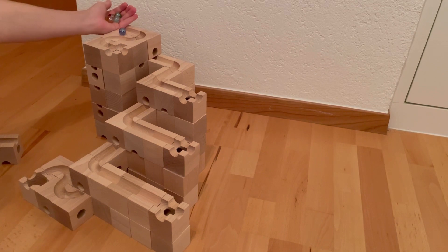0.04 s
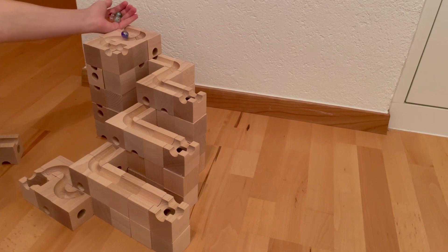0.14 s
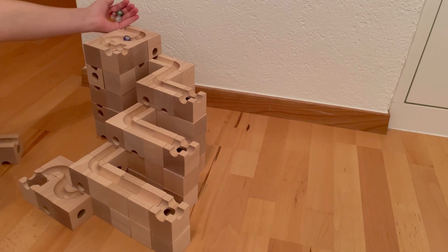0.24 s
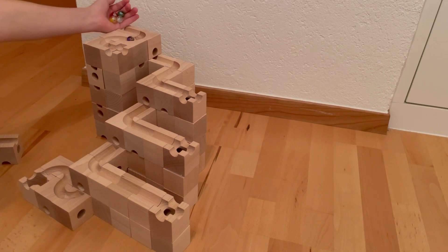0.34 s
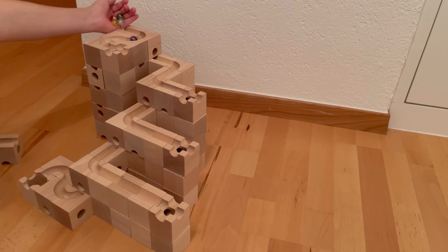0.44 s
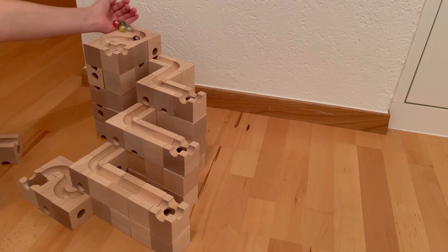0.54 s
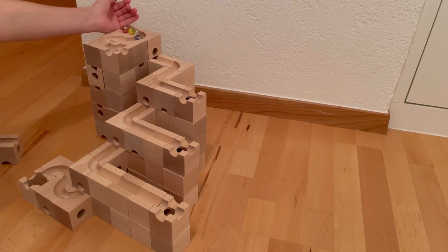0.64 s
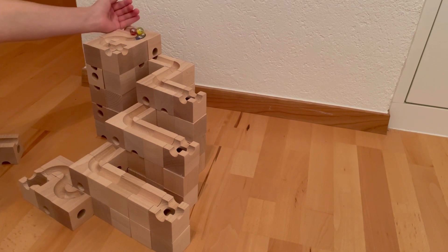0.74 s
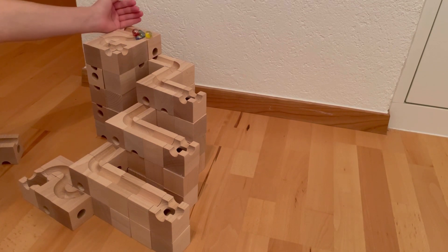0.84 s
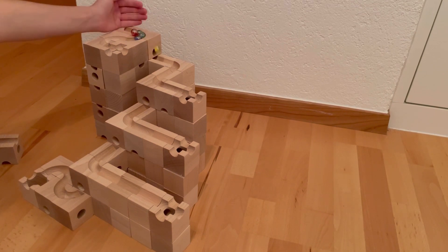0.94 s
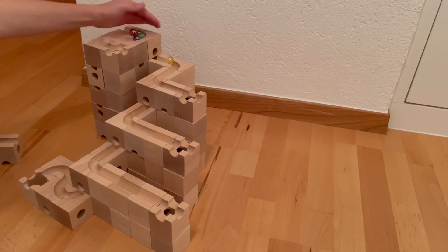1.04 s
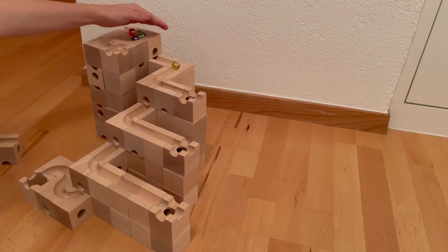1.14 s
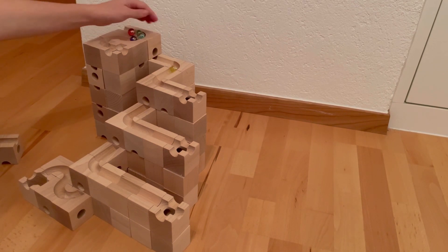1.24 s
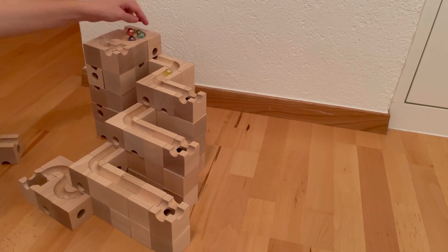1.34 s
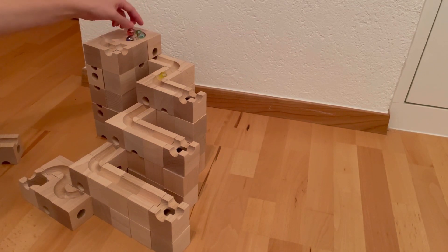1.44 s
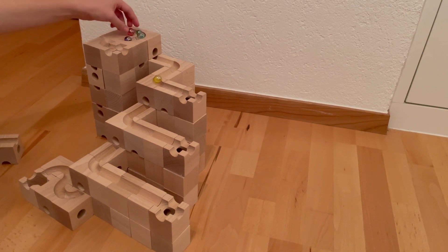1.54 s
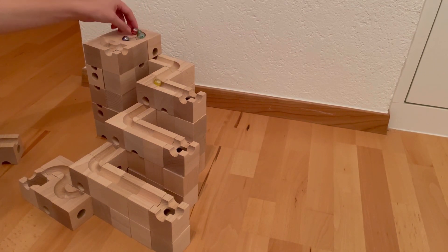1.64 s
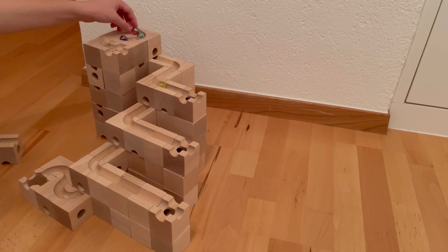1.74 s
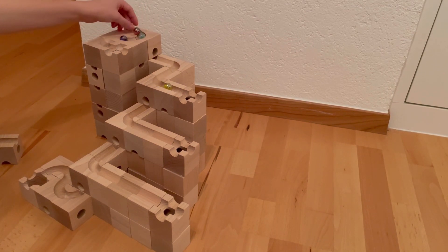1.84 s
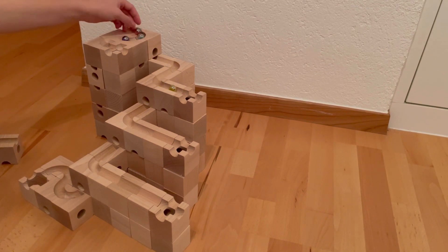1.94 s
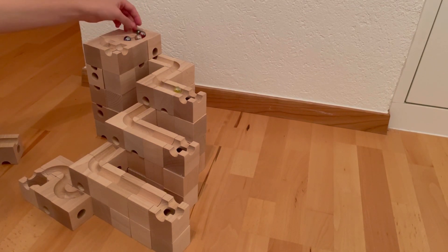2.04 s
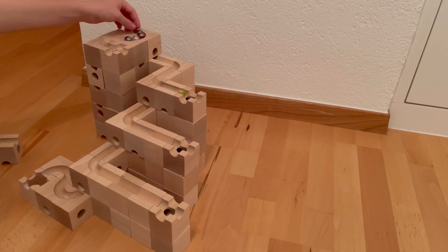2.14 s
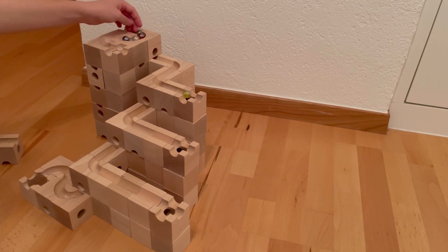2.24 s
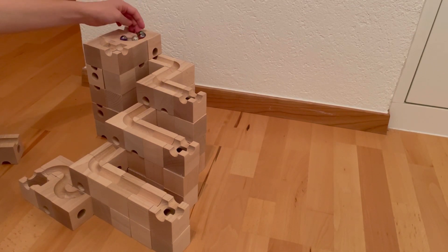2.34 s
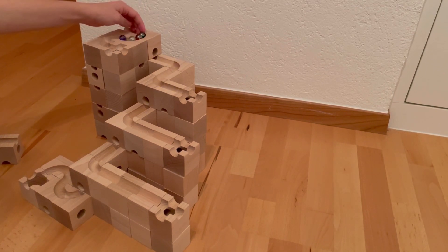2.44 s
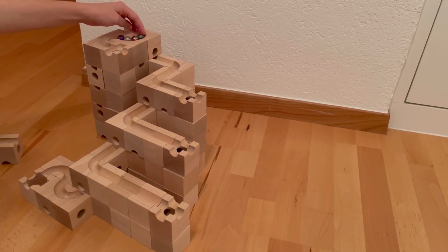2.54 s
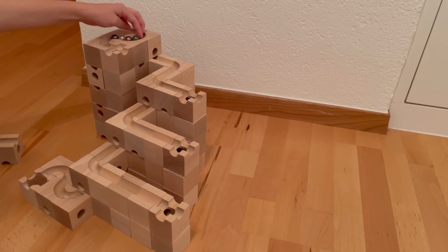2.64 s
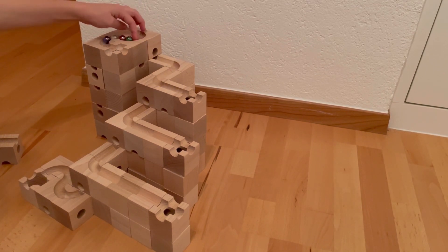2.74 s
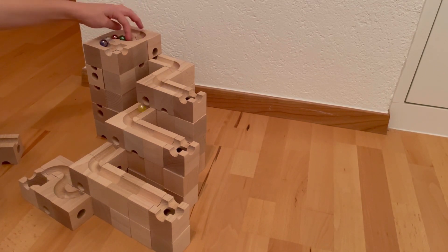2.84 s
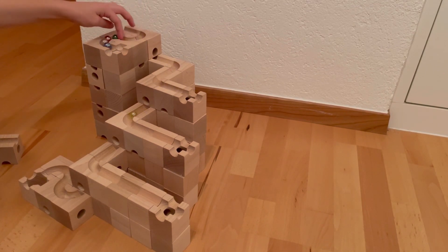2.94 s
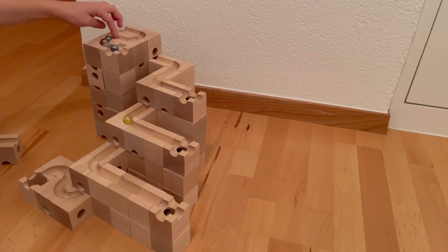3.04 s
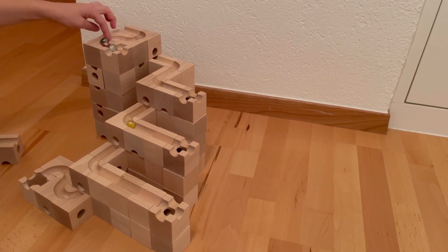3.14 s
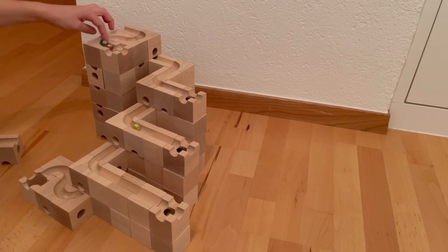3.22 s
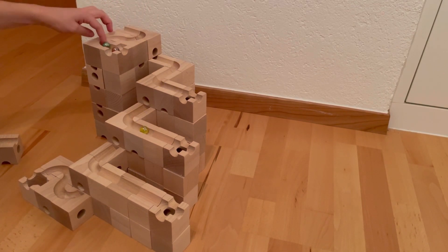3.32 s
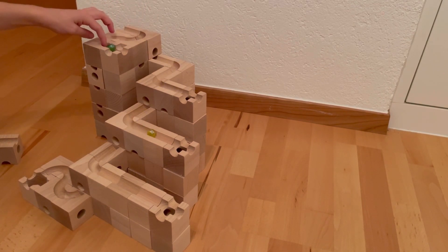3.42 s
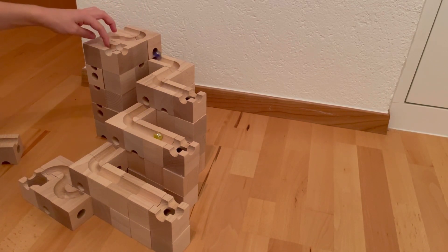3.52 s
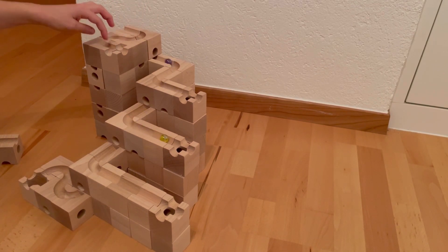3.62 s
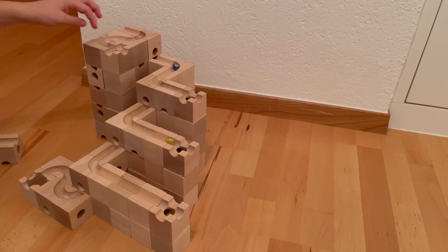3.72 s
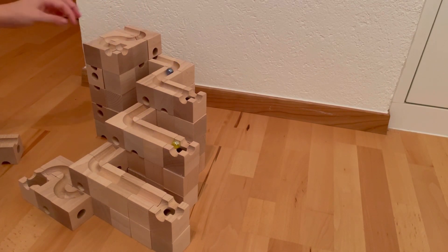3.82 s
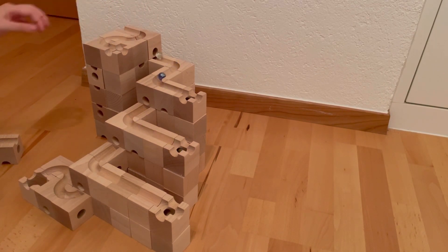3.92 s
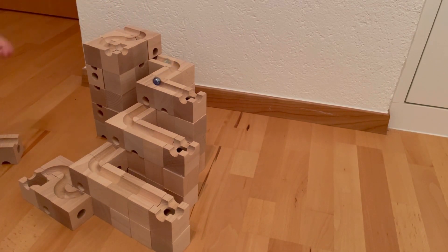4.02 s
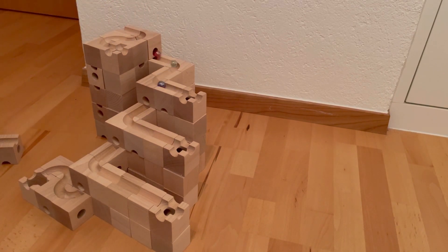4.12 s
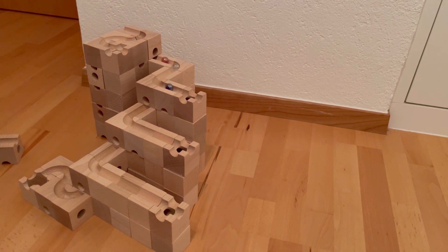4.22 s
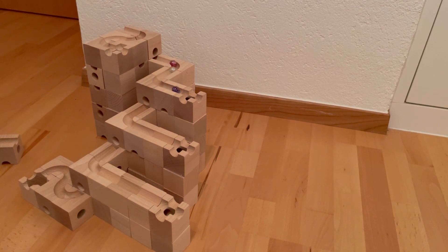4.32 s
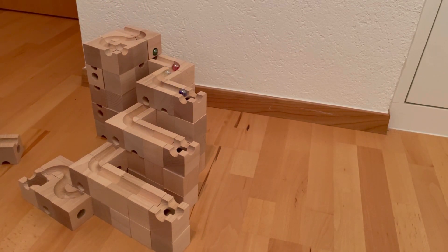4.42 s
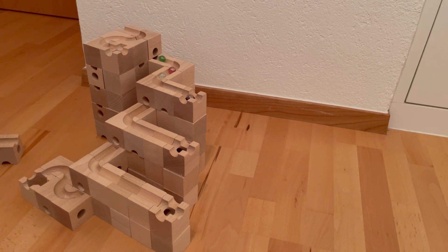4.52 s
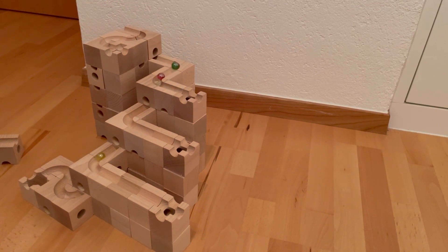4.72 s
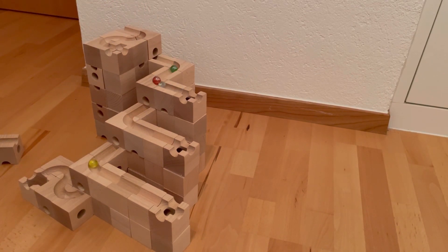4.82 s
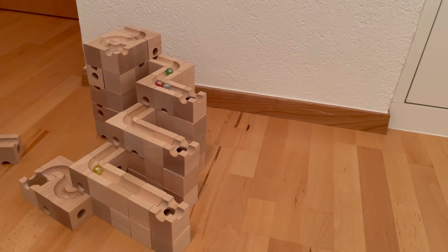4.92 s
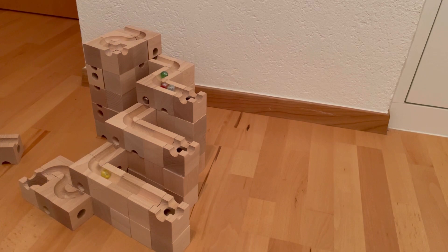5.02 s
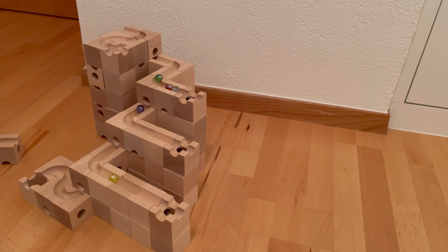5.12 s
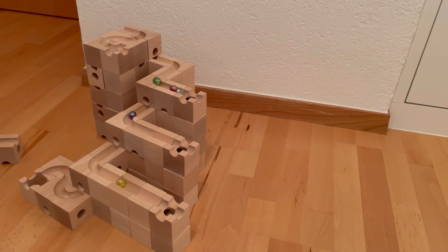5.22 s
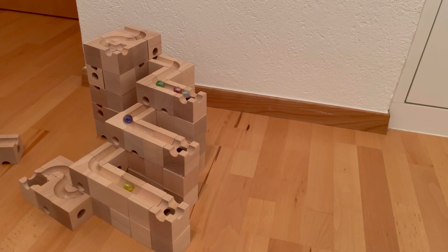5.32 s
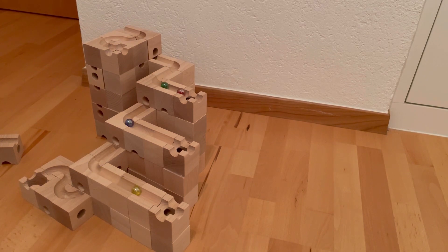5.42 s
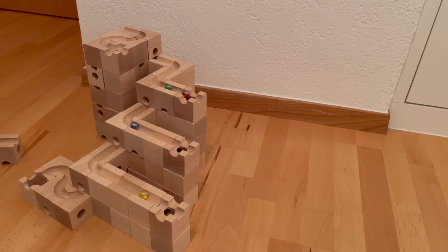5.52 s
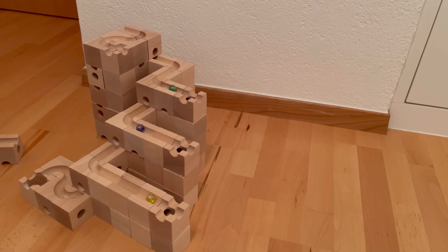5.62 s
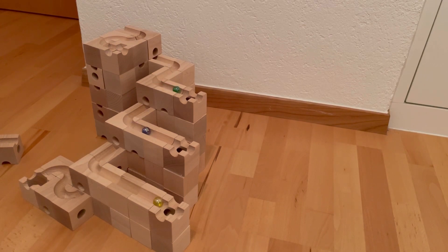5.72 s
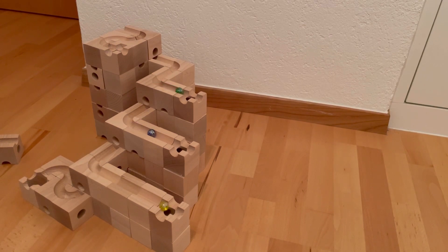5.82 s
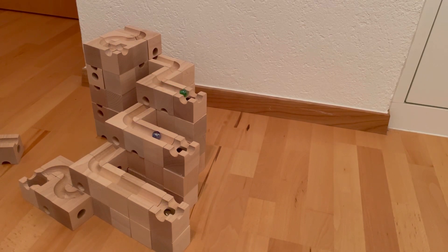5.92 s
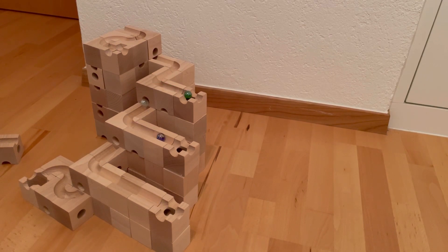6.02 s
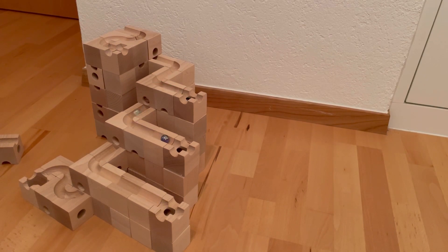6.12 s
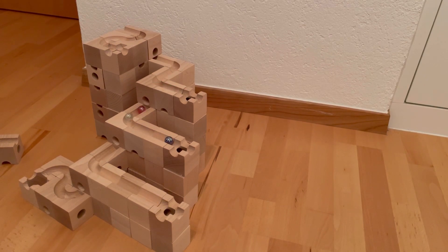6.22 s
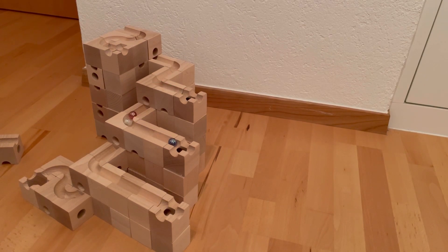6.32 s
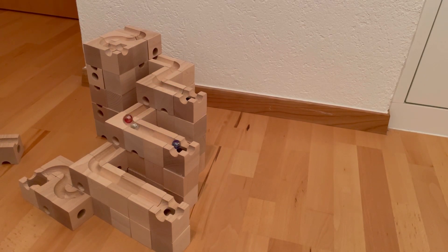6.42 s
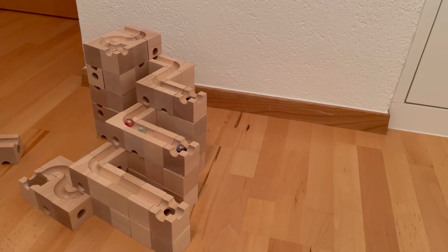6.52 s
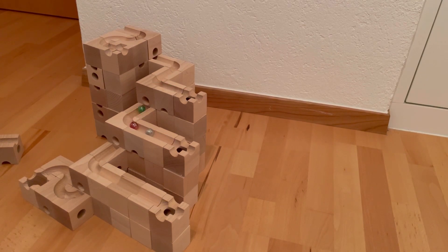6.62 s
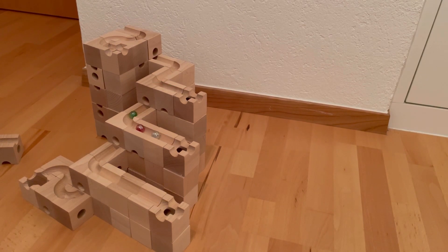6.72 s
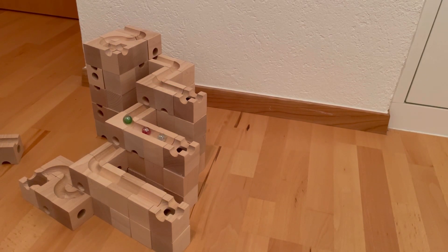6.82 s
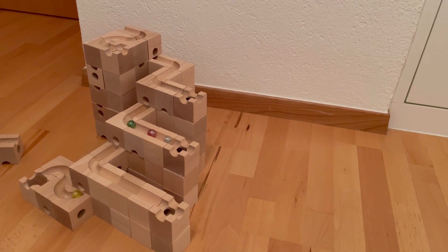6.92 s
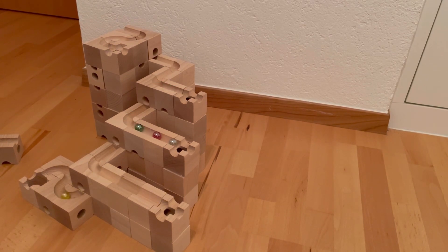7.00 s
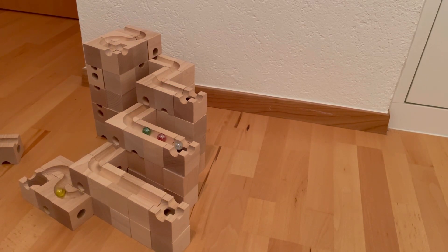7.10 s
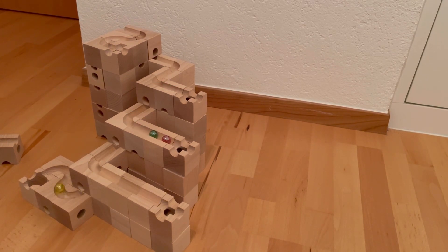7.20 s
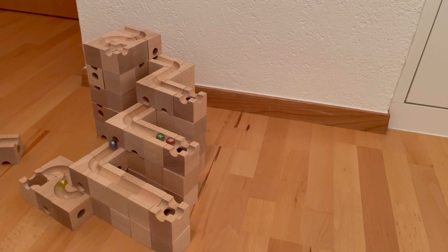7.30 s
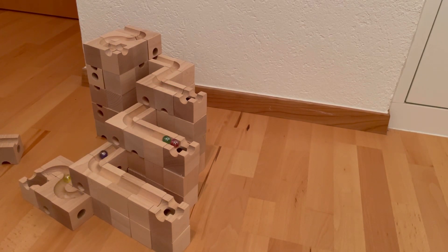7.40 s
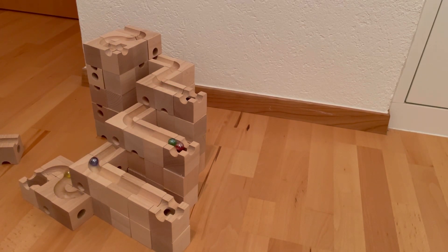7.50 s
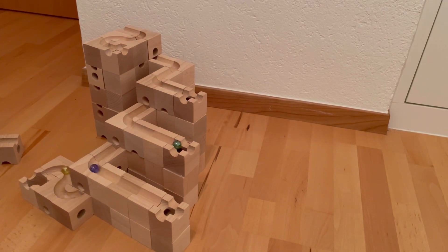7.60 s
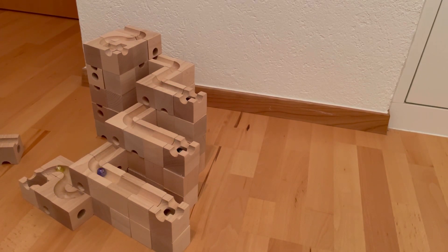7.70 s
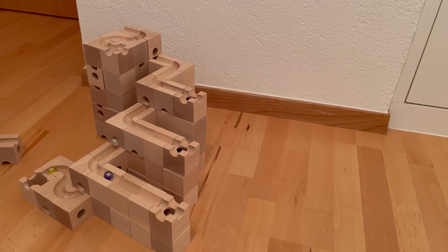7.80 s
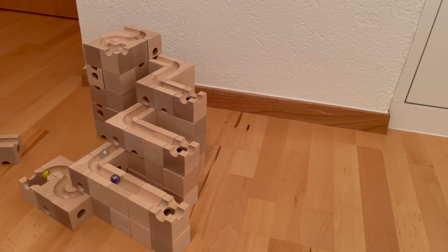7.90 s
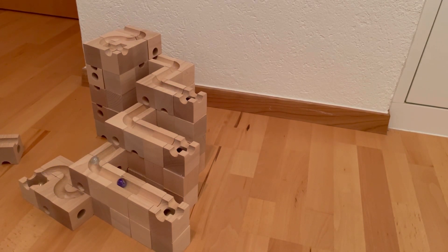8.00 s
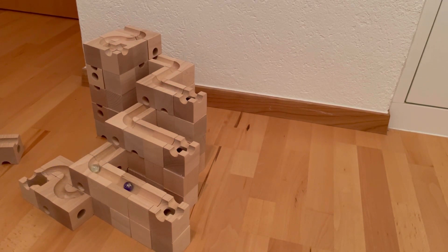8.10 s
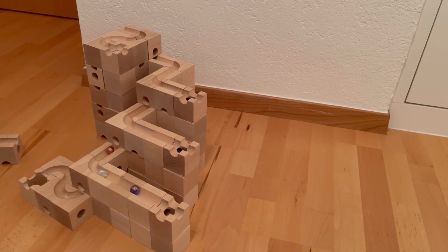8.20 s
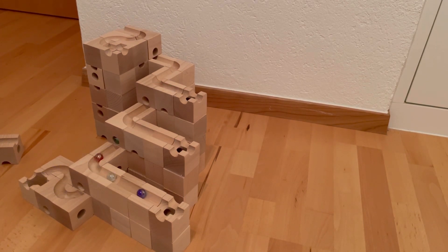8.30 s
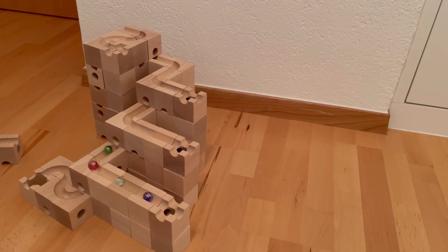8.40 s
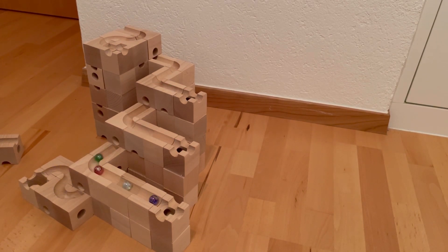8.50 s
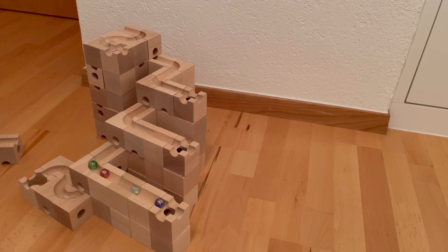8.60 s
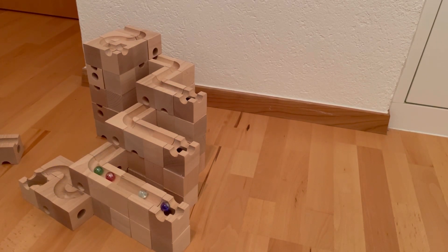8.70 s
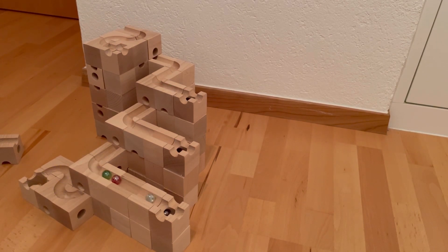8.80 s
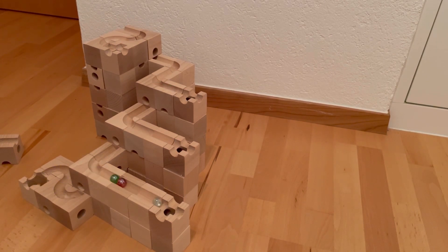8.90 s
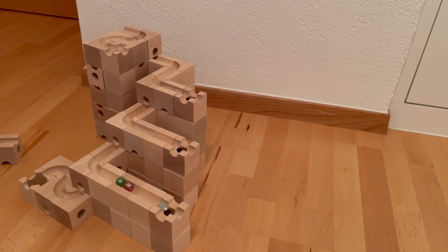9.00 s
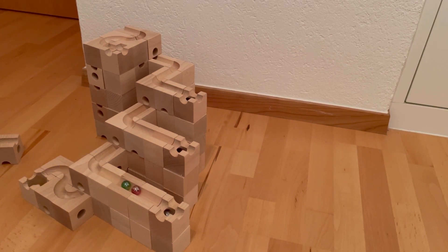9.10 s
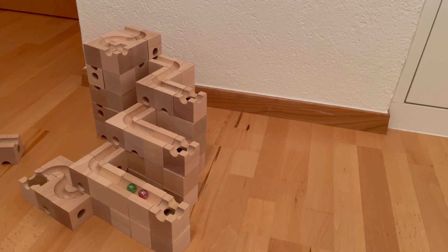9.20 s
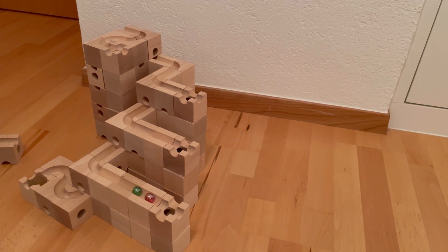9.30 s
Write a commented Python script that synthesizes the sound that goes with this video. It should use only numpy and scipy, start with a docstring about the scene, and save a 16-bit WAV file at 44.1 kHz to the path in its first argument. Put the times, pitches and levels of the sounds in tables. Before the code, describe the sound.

Close-up of a wooden marble run on a parquet floor. Marbles land in a quick burst, clack together, nearly fall quiet, then are nudged off and descend one after another: dry hollow knocks, light high pings, grainy rolling and soft low floor rumble. The clatter grows busy, peaks with a hard knock, then thins to a few taps. Small, lightly reverberant room.

```python
"""Glass marbles drop into a tower of wooden blocks on a parquet floor and run down its grooves and tunnels.
Each blow rings thud and knock modes, adds a high sine ping, and cracks and ticks in bursts of noise.
Marbles clack together in treble bursts, rumble along on dense tiny bumps, and hollow blocks hum as noise
through narrow resonances; low noise drones in the floor. A bare room answers with decaying noise echoes.
Two close microphone ports listen; they differ in level and phase, and faint sound is turned down."""
import sys
import numpy as np
from scipy import signal
from scipy.fft import rfft, irfft, next_fast_len
from scipy.io import wavfile
from scipy.ndimage import uniform_filter1d, minimum_filter1d

SR = 44100
rng = np.random.default_rng(int(sys.argv[2]) if len(sys.argv) > 2 else 0)


def pcm_store(signal):
    """Save signal as 16-bit PCM."""
    levels = np.round(np.clip(np.atleast_2d(signal), -1, 1) * 32767)
    wavfile.write(sys.argv[1], SR, levels.astype(np.int16).T)


N = 412335


def amp(db):
    """Amplitude factor of a level in dB."""
    return 10 ** (np.asarray(db) / 20)


def rms_one(x):
    """Scale to an RMS of one."""
    return x / np.sqrt(np.mean(x ** 2) + 1e-20)


def at_hz(points, hz):
    """Read a curve, straight over log frequency."""
    curve_hz, values = np.transpose(points)
    return np.interp(np.log(np.maximum(hz, 1)), np.log(np.maximum(curve_hz, 1)), values)


def in_time(rows):
    """Columns of a curve over seconds, read at every sample."""
    s, *columns = np.transpose(rows)
    return [np.interp(np.arange(N) / SR, s, column) for column in columns]


def in_frequency(x, response):
    """Filter by a complex response given as a function of Hz."""
    size = next_fast_len(N + SR)
    hz = np.arange(size // 2 + 1) * SR / size
    return irfft(rfft(x, size) * response(hz), size)[..., :N]


def band(x, low_hz, high_hz, order):
    """Butterworth band-pass."""
    edges = [low_hz, min(high_hz, .45 * SR)]
    return signal.sosfilt(signal.butter(order, edges, "band", fs=SR, output="sos"), x)


def ring(clicks, hz, t60):
    """A unit click sets a sine of height about 1 ringing; it falls 60 dB in t60 seconds."""
    r, w = amp(-60 / (t60 * SR)), 2 * np.pi * hz / SR
    return signal.lfilter([0, np.sin(w)], [1, -2 * r * np.cos(w), r * r], clicks + 1e-18)


def wood(modes, at, level_db, spread_db, centre_hz, focus_db, scatter_s):
    """Every contact strikes each mode with its own strength and small lag, most of all those near its centre."""
    chance = rng.standard_normal((len(at), len(modes), 2))
    out = np.zeros(N)
    for k, (hz, mode_db, t60) in enumerate(modes):
        lag = (np.abs(chance[:, k, 1]) * scatter_s * SR).astype(int)
        away_db = focus_db * np.abs(np.log2(hz / centre_hz))   # focus_db per octave from the centre
        strike_db = level_db + mode_db - away_db + spread_db * chance[:, k, 0]
        clicks = np.zeros(N)
        clicks[np.minimum(at + lag, N - 1)] = amp(strike_db) * (-1) ** k   # neighbouring modes start opposed
        out += ring(clicks, hz, t60)
    return out


# a marble runs on after a blow: its noise swells, then fades (amplitude time constants)
RUN_RISE_S, RUN_FADE_S = 0.004, 0.074


def run_on(level_db):
    """Height of the rolling noise that the blows leave behind: a swell and a fade after each, powers added."""
    power = np.zeros(N)
    power[np.round(np.array(BLOWS)[:, 0] * SR).astype(int)] = amp(2 * level_db)
    rise, fade = np.exp(-2 / (RUN_RISE_S * SR)), np.exp(-2 / (RUN_FADE_S * SR))
    risen = signal.lfilter([1 - rise], [1, -rise], power + 1e-18)
    return np.sqrt(signal.lfilter([1], [1, -fade], risen))


# Steady rolling in the grooves between blows. Each row: time in seconds, rumble in dB, rattle in dB.
ROLL = [(0.0, -53.5, -81), (0.4, -68, -72), (0.7, -43, -70), (1.3, -70.5, -78.5), (1.62, -59, -100),
        (1.705, -63, -94), (1.72, -51, -71), (1.81, -60.5, -64), (1.86, -82, -83), (1.9, -99, -99),
        (2.1, -86, -59.5), (2.4, -54.5, -67), (3.0, -45.5, -62.5), (3.5, -42.5, -41), (3.75, -51, -60),
        (4.4, -43, -56), (5.1, -57, -88), (5.9, -46.5, -52), (7.6, -48.5, -69), (8.1, -48, -51),
        (8.64, -53, -80), (9.35, -55.5, -69)]
RUN_RUMBLE_DB, RUN_RATTLE_DB = -19.5, -22   # after a blow, against its thud and its knock
LUMPS_PER_S, LUMPS_DB = 27, 2   # the grain is uneven, so the rolling comes in lumps


def rolling():
    """Marbles run over the grain: dense tiny bumps rumble in the low modes and rattle in the high ones."""
    rumble_db, rattle_db = in_time(ROLL)
    s, knock_db, thud_db, thud_hz, *_ = np.transpose(BLOWS)
    at = np.flatnonzero(rng.random(N) < 350. / SR)   # about 350 bumps a second
    lumps = rms_one(uniform_filter1d(rng.standard_normal(N), size=int(SR / LUMPS_PER_S)))
    size_db = 2.5 * np.minimum(rng.exponential(1, len(at)), 3.5) + LUMPS_DB * lumps[at]
    # it rolls in the block it last struck
    rumble_hz = thud_hz[np.maximum(np.searchsorted(s * SR, at) - 1, 0)]
    rumble = wood(THUD_MODES, at, size_db, spread_db=3.0, centre_hz=rumble_hz, focus_db=7.0, scatter_s=.002)
    rattle = wood(KNOCK_MODES, at, size_db, spread_db=5.0, centre_hz=1110.0, focus_db=5.0, scatter_s=.0005)
    rumble = rms_one(band(rumble, 222.0, 1380.0, order=3))
    rattle = rms_one(band(rattle, 400.0, 7100.0, order=2))
    rumble_height = np.hypot(amp(rumble_db), run_on(thud_db + RUN_RUMBLE_DB))
    rattle_height = np.hypot(amp(rattle_db), run_on(knock_db + RUN_RATTLE_DB))
    return rumble_height * rumble + rattle_height * rattle


# Drone through the floor, once marbles run low in the tower. Each row: time in seconds, level in dB.
DRONE = [(0.0, -73), (1.9, -80), (2.97, -98), (3.15, -61.5), (5.0, -56), (9.35, -65)]
# How much of each run reaches the floor. Each row: time in seconds, gain in dB.
DRONE_FOLLOWS = [(0.0, -5.5), (2.97, 3.5), (3.15, 13.5), (7.4, 16.5), (9.35, 12)]
RUN_DRONE_DB = -41.5   # against the thud, before the gain above


def drone():
    """Low noise from the floorboards, nearly alike at both ports; it swells with each run."""
    (level_db,), (follows_db,) = in_time(DRONE), in_time(DRONE_FOLLOWS)
    shared, unlike = band(rng.standard_normal((2, N)), 26.0, 182.0, order=2)
    both = shared + amp(-14.0) * np.array([[1], [-1]]) * unlike
    runs = amp(follows_db) * run_on(np.array(BLOWS)[:, 2] + RUN_DRONE_DB)
    return np.hypot(amp(level_db), runs) * rms_one(both)


def bending(hz, lag_s, power):
    """Bending waves in wood travel slower the lower they are: lag_s at 1 kHz."""
    lag = lag_s * (np.maximum(hz, 150.) / 1000) ** -power
    return np.exp(-2j * np.pi * np.cumsum(lag) * hz[1])   # phase is the lag summed over frequency


def noise_bursts(times, level_db, t60, low_hz, high_hz):
    """Very short bursts of treble noise, each scaled to its own peak."""
    t, out = np.arange(600) / SR, np.zeros(N + 600)
    noise = rng.standard_normal((len(times), len(t))) * amp(-60 * t / t60)
    bursts = band(noise, low_hz, high_hz, order=3)
    for s, gain, burst in zip(times, amp(level_db), bursts):
        out[round(s * SR):][:len(t)] += gain * burst / np.abs(burst).max()
    return out[:N]


# Marble on wood, all down the tower. Each row: start in seconds, knock in dB, thud in dB,
# thud centre in Hz, ping in dB, ping pitch in Hz, crack in dB.
BLOWS = [(0.048, -109, -63, 548, -50, 6040, -52), (0.194, -19.5, -18, 543, -48, 6400, -21.5),
         (0.502, -14, -16.5, 530, -37, 5700, -28), (0.518, -19, -13, 486, -23, 6650, -20.5),
         (0.563, -26, -18, 516, -31, 6600, -32), (0.582, -15, -14, 512, -30, 5700, -23),
         (0.595, -24, -50, 514, -27, 6880, -27), (0.609, -19, -19.5, 465, -34, 5650, -27),
         (0.645, -23.5, -29, 478, -48, 6570.0, -54), (0.807, -28, -22, 506, -45, 7200, -61),
         (0.832, -35, -34.5, 520, -46, 5600, -53), (0.975, -12.5, -15.5, 413, -28, 4240, -23.5),
         (1.065, -20, -18.5, 353, -39, 3900, -38), (1.107, -35, -24, 440.0, -41.5, 5600, -36),
         (1.28, -36, -34, 572, -57, 4000, -51.5), (1.527, -38.5, -38.5, 488, -77, 3820, -72),
         (1.711, -47, -37.5, 335, -82, 3840.0, -107), (1.782, -47, -53.5, 583, -81.5, 5300.0, -72),
         (2.026, -22, -20, 510, -29.5, 7400, -25), (2.048, -34, -29.5, 560, -32, 5700, -44),
         (2.079, -25, -25.5, 495, -35, 5700, -28.5), (2.116, -26, -27.5, 455, -48, 5100, -56),
         (2.307, -23.5, -25, 607, -39, 5320.0, -45), (2.332, -40, -29, 310, -49, 5400, -55),
         (2.411, -31, -31, 473, -29.5, 7250, -35), (2.569, -30.5, -35, 518, -38, 7100, -30.5),
         (2.616, -32, -30, 540, -53, 5600, -55), (2.646, -25, -31, 470, -38, 5730, -43),
         (2.683, -30.5, -34, 400, -42, 5860, -35), (2.834, -25, -26, 410, -38, 5500, -34),
         (2.863, -21.5, -27.5, 497, -26, 5450, -23), (3.092, -26.5, -32, 576, -28, 5220, -50),
         (3.111, -19.5, -22, 520, -37, 6600, -31), (3.148, -36, -29, 530, -44, 5240, -49),
         (3.193, -30, -30.5, 520, -53, 5340, -52), (3.209, -33, -32.5, 540, -21, 5200, -24.5),
         (3.235, -27, -23.5, 538, -47, 5400.0, -49), (3.34, -25.5, -27, 486, -18.5, 5230.0, -26),
         (3.396, -24.5, -26.5, 466, -24, 4800, -19), (3.424, -27, -30, 550, -37, 5300, -47),
         (3.463, -36, -28, 570, -25, 4500, -16.5), (3.508, -38, -25.5, 470.0, -22, 5260, -29),
         (3.526, -34, -28, 520, -45, 5300, -45), (3.553, -17.5, -22.5, 416, -28, 6430, -17),
         (3.591, -28, -30, 477, -22.5, 5400, -18.5), (3.622, -23.5, -21, 547, -30, 6800, -47),
         (3.766, -24, -24, 487, -39, 4300, -40), (3.791, -25, -26, 560, -38, 4680, -29),
         (3.909, -22, -21, 380, -33, 5540, -30), (3.929, -14.5, -22, 368, -26, 5600, -21.5),
         (3.953, -33, -18.5, 394, -28, 7170, -26), (4.06, -43, -29.5, 627, -55, 5500, -59),
         (4.122, -29.5, -28, 360, -60, 3800, -47), (4.171, -18, -21, 414, -24, 6610, -20.5),
         (4.215, -25, -27, 422, -50, 5500, -45), (4.228, -28, -24, 417, -25, 7130, -26.5),
         (4.272, -27.5, -31.5, 500, -53, 5500, -50), (4.337, -29, -41, 390, -41, 4280, -41),
         (4.379, -36, -40, 384, -41, 3800.0, -36), (4.403, -35, -32.5, 630, -58, 5460, -59),
         (4.483, -18, -22.5, 430, -24, 6630, -21), (4.528, -32, -24, 554, -50, 5500, -50),
         (4.551, -22, -21, 605, -43, 4000, -31.5), (4.611, -18.5, -24, 290, -17.5, 6700, -17),
         (4.666, -30, -40, 340, -47, 6600, -35), (4.755, -37, -34, 610, -53, 5500, -55),
         (4.788, -23, -29, 503, -37, 5780, -39), (4.819, -28.5, -37, 695, -42, 5760, -34),
         (4.837, -34, -55, 448, -40, 5700, -33.5), (4.859, -33, -35.5, 652, -55, 5800, -50),
         (4.93, -34, -34, 467, -55, 5700, -53), (4.956, -33.5, -29, 474, -57, 5800, -52),
         (5.095, -16, -24.5, 504, -17, 6690, -22), (5.165, -29.5, -28, 353, -31, 6700, -31),
         (5.241, -43, -40, 660, -51, 6700, -53), (5.329, -47, -41, 590, -58, 6700, -62),
         (5.392, -23.5, -24, 618, -31, 6500, -33.5), (5.416, -21.5, -26.5, 610, -26, 6900, -24),
         (5.4266, -31, -27, 640, -26.5, 5300, -35), (5.4467, -28, -30, 642, -28.5, 6650, -29),
         (5.602, -26.5, -23, 570, -35, 6660, -40), (5.625, -20.5, -23, 630, -30, 6780, -30.5),
         (5.6642, -32, -27, 670, -58, 4660, -38), (5.797, -38, -44, 646, -57, 5500, -61),
         (5.829, -27, -29.5, 406, -43, 4000, -40), (5.863, -27, -31, 593, -41, 4240, -65),
         (5.894, -22, -22, 357, -51, 7000, -33), (5.9161, -16, -17, 378, -33, 5330, -28.5),
         (5.999, -30, -29, 341, -45, 5300, -41), (6.041, -28, -29, 340, -45, 5300, -41),
         (6.063, -17.5, -21.5, 580, -22, 5400, -18.5), (6.093, -26, -30, 413, -45, 5360, -45),
         (6.104, -29, -27.5, 302, -31, 7060, -36), (6.13, -34, -30, 557, -50, 5400, -40),
         (6.205, -21, -28, 595, -37, 5480, -27), (6.325, -31, -31, 590, -47, 5660, -42),
         (6.372, -30, -43, 675, -56, 4150.0, -49), (6.399, -23.5, -30, 590, -41, 5670, -41.5),
         (6.492, -33, -45, 488, -48, 5560, -50), (6.527, -24, -23.5, 350, -36, 5500, -23.5),
         (6.542, -24, -31, 515, -29, 5640, -41), (6.566, -17.5, -18.5, 472, -22, 5620, -22.5),
         (6.593, -40, -32, 660, -45, 5460, -45), (6.625, -19.5, -26, 538, -27, 5320, -19),
         (6.667, -31, -27, 425, -50, 5500, -47), (6.756, -29, -26.5, 404, -43, 4430, -40),
         (6.824, -35, -34.5, 386, -58, 3830, -64), (6.922, -20.5, -26.5, 460, -65, 3900, -50),
         (6.928, -16.5, -23, 456, -56, 3830, -25.5), (6.963, -25, -25, 450, -29, 3560, -48),
         (7.111, -34, -29, 377, -39, 3730, -43), (7.144, -34, -47, 402, -44, 6160, -42),
         (7.17, -24.5, -28, 490, -19.5, 5570, -29), (7.192, -21, -26, 438, -52, 5360, -31),
         (7.239, -38, -24, 505, -55, 5400, -55), (7.264, -52, -32, 580, -35, 5350, -50),
         (7.353, -20, -26.5, 290, -27, 6620, -22.5), (7.408, -30, -29.5, 347, -55, 7160, -35),
         (7.558, -25, -24, 514, -31.5, 5600, -31), (7.58, -18, -23, 391, -24, 5500, -20.5),
         (7.703, -22, -27, 372, -24, 5580, -28.5), (7.722, -23, -23, 522, -48, 5440, -37),
         (7.775, -27.5, -30.5, 410, -39, 5380, -58), (7.798, -46, -31, 390, -32.5, 5380, -44),
         (7.855, -33, -37, 342, -61, 5550, -62), (7.876, -21.5, -23, 313, -18.5, 5480, -20),
         (7.927, -25.5, -26.5, 318, -32, 6800, -33), (8.012, -27, -25.5, 380, -38, 3750, -52),
         (8.032, -8.5, -10.5, 440, -17, 4400, -19), (8.094, -24, -45, 487, -17.5, 4360, -35),
         (8.1272, -15, -15, 417, -22, 4450, -41), (8.166, -37, -48, 403, -42, 5260, -48),
         (8.178, -19, -16, 434, -27.5, 4360, -33), (8.218, -33, -46, 360, -23.5, 5450, -30),
         (8.218, -18.5, -20, 353, -19, 6660, -23.5), (8.396, -18, -24, 321, -19.5, 6700, -21),
         (8.498, -56, -40, 376, -61, 6640, -73), (8.627, -43, -30.5, 364, -59, 7090.0, -101),
         (8.7, -46, -44, 356, -67, 5460, -74), (8.715, -40, -35, 317, -50, 5270, -52),
         (8.789, -24, -22.5, 364, -34, 6970, -41), (8.81, -18, -19, 326, -33, 5300, -35),
         (8.844, -53, -50, 338, -36, 5500, -47), (8.873, -54, -32, 312, -44, 7000, -59),
         (8.954, -53, -28, 345, -41, 6750, -48), (9.099, -23.5, -24.5, 397, -22, 5430, -39),
         (9.12, -24.5, -21, 378, -47, 5030, -30), (9.173, -23, -19, 358, -58, 5540, -35),
         (9.287, -35.5, -37.5, 322, -59, 5600, -45), (9.325, -30, -29, 334, -45, 4040, -45)]
# Low and high modes of the stacked blocks. Each row: pitch in Hz, relative level in dB, t60 in seconds.
THUD_MODES = [(201.6, -7, 0.14), (281.2, 3, 0.04), (330, 2.5, 0.0087), (392.4, 2, 0.016), (431, 1, 0.021),
              (516, 1.5, 0.019), (675, 7.5, 0.012)]
KNOCK_MODES = [(810, -1, 0.0074), (1004, 0.5, 0.011), (1240, 0.5, 0.0071), (1468, 3, 0.0064),
               (1870, 2.5, 0.0069), (2123, 2, 0.0099), (2505, -1, 0.0088), (2924, 4.5, 0.0067),
               (3580, 0, 0.0056), (4500, -3.5, 0.0025)]
# Each block pairs its thud with a knock of its own. Each row: thud centre in Hz, knock centre in Hz.
KNOCK_HZ_BY_THUD = [(300, 1570), (345, 1140), (400, 1300), (500, 1200), (620, 1220), (680, 1100)]
PING_T60_S, CRACK_T60_S, TICK_T60_S = .016, .007, 0.03
TICK_UNDER_CRACK_DB = 13.5


def blows():
    """Glass strikes wood: modes thud and knock, noise cracks and ticks; the sine pings come apart."""
    s, knock_db, thud_db, thud_hz, ping_db, ping_hz, crack_db = np.transpose(BLOWS)
    at = np.round(s * SR).astype(int)
    knock_hz = at_hz(KNOCK_HZ_BY_THUD, thud_hz)
    thuds = wood(THUD_MODES, at, thud_db, spread_db=2.5, centre_hz=thud_hz, focus_db=24.0, scatter_s=0.00027)
    knocks = wood(KNOCK_MODES, at, knock_db, spread_db=1.5, centre_hz=knock_hz, focus_db=8.5, scatter_s=.00005)
    # small blocks radiate no deep bass, and the contact is too soft for sharp edges
    body = band(thuds, 174.0, 1930.0, order=3) + band(knocks, 370.0, 2900.0, order=2)
    body = in_frequency(body, lambda hz: bending(hz, lag_s=0.001112, power=0.721))
    cracks = noise_bursts(s, crack_db, CRACK_T60_S, low_hz=2350.0, high_hz=8330.0)
    ticks = noise_bursts(s, crack_db - TICK_UNDER_CRACK_DB, TICK_T60_S, low_hz=7150.0, high_hz=14650.0)
    t, pings = np.arange(2000) / SR, np.zeros(N)
    envelope = amp(-60 * t / PING_T60_S) * (1 - np.exp(-t / .0005))
    for i, hz, gain in zip(at, ping_hz, amp(ping_db)):
        ping = np.sin(2 * np.pi * hz * t) * envelope
        pings[i:i + len(t)] += gain * ping[:N - i]
    return body + cracks + ticks, pings


# Bass of the wood: blows on top of the tower carry less than those near the floor.
# Each row: time in seconds, gain below BASS_HZ in dB.
BASS = [(0.0, -11.5), (1.9, -3.5), (2.97, -4), (3.15, 2.5), (9.35, 2)]
BASS_HZ = 255


def by_height(x):
    """Turn the bass up or down with the marbles' height in the tower."""
    bass = in_frequency(x, lambda hz: 1 / (1 + (hz / BASS_HZ) ** 8))
    return x + (amp(in_time(BASS)[0]) - 1) * bass


# Marble on marble. Each row: start in seconds, level in dB.
CLACKS = [(0.2862, -22), (0.4758, -38.5), (0.705, -21.5), (0.713, -23.5), (0.7234, -28), (0.796, -20),
          (0.8587, -34), (1.055, -36), (1.7772, -37), (1.952, -40), (2.137, -27.5), (2.3275, -24.5),
          (2.39, -28.5), (2.4405, -31), (2.5253, -27.5), (2.576, -31), (3.1725, -34.5), (3.3953, -21),
          (3.466, -21), (3.4774, -39), (3.5897, -46), (3.673, -31), (3.7948, -29.5), (5.8792, -25.5),
          (6.971, -42), (7.051, -48), (7.061, -42), (7.489, -48), (7.7232, -23), (8.12, -25),
          (8.9374, -36.5)]
CLACK_T60_S = 0.017


def clacks():
    """Hard glass meets hard glass: short bursts of treble noise."""
    return noise_bursts(*np.transpose(CLACKS), CLACK_T60_S, low_hz=4700.0, high_hz=15500.0)


# Short hums of the hollow blocks while a marble rolls through.
# Each row: start in seconds, length in seconds, pitch in Hz, level in dB.
HUMS = [(0.562, 0.18, 405, -42), (1.678, 0.015, 544, -52), (1.72, 0.078, 296, -55),
        (1.708, 0.046, 670, -50.5), (1.775, 0.018, 580, -49), (2.305, 0.073, 275, -52),
        (2.36, 0.085, 688, -47.5), (2.42, 0.044, 287, -51.5), (2.463, .15, 295, -53.5),
        (2.71, 0.094, 469, -47.5), (2.872, 0.045, 447, -46), (2.96, .06, 296, -57)]
HUM_T60_S = 0.08
# the tunnels hum after low thuds: level against the thud, and loss per octave from the hollow pitch
HOLLOW_HZ, HOLLOW_T60_S, HOLLOW_DB, HOLLOW_FOCUS_DB = 294, 0.13, -24.5, 18.5


def hums():
    """Noise through narrow resonances: single gated hums, and the hollow tone that follows low thuds."""
    t = np.arange(N) / SR
    thud_db, thud_hz = np.transpose(BLOWS)[2:4]
    hollow_db = thud_db + HOLLOW_DB - HOLLOW_FOCUS_DB * np.abs(np.log2(thud_hz / HOLLOW_HZ))
    out = run_on(hollow_db) * rms_one(ring(rng.standard_normal(N), HOLLOW_HZ, HOLLOW_T60_S))
    for s, length, hz, level_db in HUMS:
        gate = np.clip(np.minimum((t - s) / .006, (s + length - t) / 0.019 + 1), 0, 1)
        out += amp(level_db) * gate * rms_one(ring(rng.standard_normal(N), hz, HUM_T60_S))
    return out


# Decay of the bare room. Each row: frequency in Hz, t60 in seconds.
ECHO_T60 = [(60, 1), (260, 0.35), (700, 0.5), (1840, 0.34), (4850, 0.36), (12000, 0.31)]
# Colour of its echoes. Each row: frequency in Hz, level in dB.
ECHO_COLOUR = [(60, -28), (250, -5.5), (700, 0), (2000, 2.5), (4000, 2.5), (5300, 1), (6700, 3), (7500, -1),
               (12000, 1.5)]
ECHO_DB = -25.5
PLACES = 4   # spots in the tower, each heard through echoes of its own


def room(x):
    """Blows take turns among a few places; each has two unrelated tails, half-octave noise bands dying away."""
    t, edges = np.arange(SR) / SR, 45 * 2 ** np.arange(0, 9, .5)
    # at first single echoes from floor and walls stand out, later they merge
    lumps = rms_one(uniform_filter1d(rng.standard_normal((PLACES, 1, SR)), size=60))
    echoes = rng.standard_normal((PLACES, 2, SR)) * amp(4.5 * lumps * np.exp(-t / 0.03))
    tails = np.zeros((PLACES, 2, SR))
    for low, high in zip(edges, edges[1:]):
        noise = signal.sosfilt(signal.butter(2, [low, high], "band", fs=SR, output="sos"), echoes)
        hz = np.sqrt(low * high)
        tails += noise * amp(at_hz(ECHO_COLOUR, hz) - 60 * t / at_hz(ECHO_T60, hz))
    build_up = np.clip((t - .004) / .008, 0, 1)
    # the place changes 20 samples ahead of each blow
    place = np.searchsorted(np.array(BLOWS)[:, 0] * SR - 20, np.arange(N)) % PLACES
    parts = x * (place == np.arange(PLACES)[:, None])
    answers = signal.fftconvolve(parts[:, None], tails * build_up, axes=2)[..., :N]
    return answers.sum(axis=0) * amp(ECHO_DB)


# How openly the blows face the ports; on top and inside tunnels the blocks shade them.
# Each row: time in seconds, direct sound in dB.
DIRECT = [(0, -5.5), (.45, -3), (.9, 1), (1.2, -1.5), (2.1, -1.5), (3, -0.5), (4, -1), (4.8, 1), (5.3, 2),
          (5.7, 3), (6, 0.5), (6.5, 0.5), (7.3, 0.5), (8, 0), (8.6, 1.5), (9.35, 1)]
# Room sound and hush that differ between the ports. Each row: frequency in Hz, gain in dB.
UNLIKE = [(60, -11), (250, -5.5), (600, 0.5), (1500, -1), (3500, -2), (6000, -0.5), (8300, -27),
          (12000, -32)]
PING_ECHO_DB = -4   # the ping beams towards the ports, the walls get less of it
ROLL_ECHO_DB, HUSH_DB = -4.5, -79   # the hush is set before UNLIKE shapes half of it


def scene():
    """Direct sound, room and a faint hush; the ports share most of it."""
    wooden, pings = blows()
    hits = by_height(wooden) + clacks()
    roll = by_height(rolling()) + hums()
    to_walls = hits + amp(PING_ECHO_DB) * pings + amp(ROLL_ECHO_DB) * roll
    shared, unlike = room(to_walls) + amp(HUSH_DB) * rng.standard_normal((2, N))
    unlike = in_frequency(unlike, lambda hz: amp(at_hz(UNLIKE, hz)))
    direct = amp(in_time(DIRECT)[0]) * hits + pings + roll
    return direct + drone() + shared + np.array([[1], [-1]]) * unlike


SUPPRESS_BELOW_DB, SUPPRESS_MOST_DB = -50.5, 14
SUPPRESS_SLOPE = 0.4   # dB of cut per dB below the threshold


def suppressor(x):
    """Above the bass, quiet passages are turned down further, so that faint tails fade early."""
    upper = signal.sosfilt(signal.butter(2, 300., "high", fs=SR, output="sos"), x)
    r = np.exp(-1 / (0.0043 * SR))   # power averaged over 4.3 ms
    power = signal.lfilter([1 - r], [1, -r], np.mean(upper ** 2, axis=0))
    level_db = 10 * np.log10(power + 1e-14)
    cut_db = np.clip(SUPPRESS_SLOPE * (SUPPRESS_BELOW_DB - level_db), 0, SUPPRESS_MOST_DB)
    cut_db = minimum_filter1d(cut_db, size=301)   # it opens a little ahead of a sudden sound
    treated = in_frequency(x * amp(-cut_db), lambda hz: hz > 250.)
    return treated + in_frequency(x, lambda hz: hz <= 250.)


# Response of the microphone. Each row: frequency in Hz, gain in dB.
MICROPHONE = [(30, -23), (100, -4), (3000, -4), (6500, -2), (8000, 1.5), (10000, -2), (12000, -6),
              (14000, -28.5), (15000, -10.5), (16000, -15)]
# Balance of the ports. Each row: frequency in Hz, left minus right in dB.
BALANCE = [(60, 3.5), (110, -1.5), (200, 3.5), (380, 1.5), (700, 2.5), (1290, 1.5), (2380, 2.5), (4400, 6),
           (8120, 1), (15000, -0.5)]
# Phase by which the left port leads. Each row: frequency in Hz, lead in radians.
PORT_PHASE = [(0, 0), (2000, .5), (4800, .5), (6000, -.2), (8300, -3.14), (11500, -6.2), (14500, -9.4),
              (17000, -11)]
CUTOFF_HZ = 16300   # everything above is at least 70 dB down


def record(dry):
    """Ports differ in level and phase, opposed near 8 kHz; faint sound is suppressed, the top is cut."""
    side = np.array([[.5], [-.5]])   # left and right each take half the difference
    phase_hz, lead = np.transpose(PORT_PHASE)

    def port_response(hz):
        gain = amp(at_hz(MICROPHONE, hz) + side * at_hz(BALANCE, hz))
        return gain * np.exp(1j * side * np.interp(hz, phase_hz, lead))

    ports = suppressor(in_frequency(dry, port_response))
    return signal.sosfilt(signal.cheby2(12, 70, CUTOFF_HZ, fs=SR, output="sos"), ports)


dry = scene()
out = record(dry)
pcm_store(out)
```